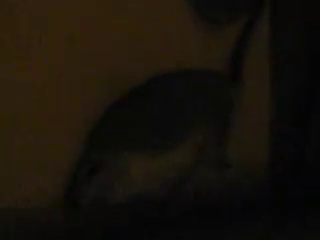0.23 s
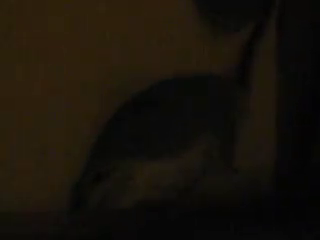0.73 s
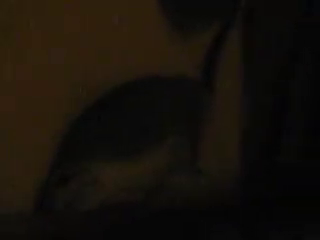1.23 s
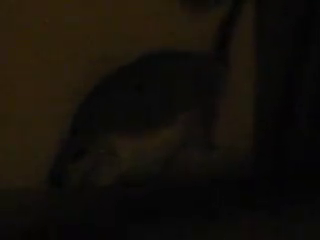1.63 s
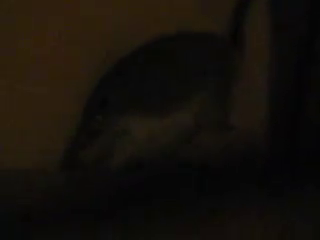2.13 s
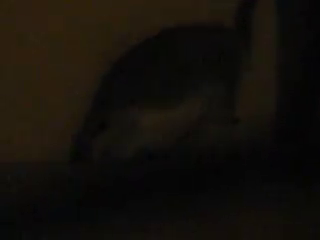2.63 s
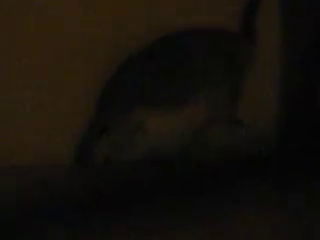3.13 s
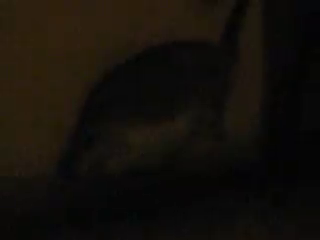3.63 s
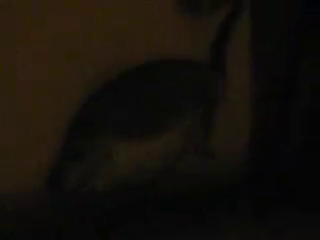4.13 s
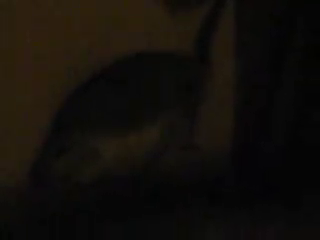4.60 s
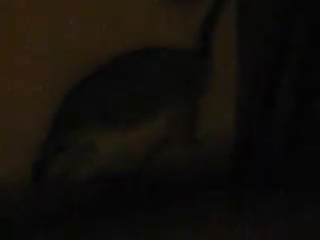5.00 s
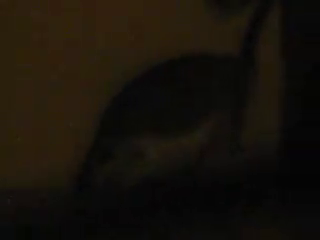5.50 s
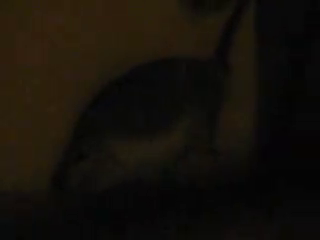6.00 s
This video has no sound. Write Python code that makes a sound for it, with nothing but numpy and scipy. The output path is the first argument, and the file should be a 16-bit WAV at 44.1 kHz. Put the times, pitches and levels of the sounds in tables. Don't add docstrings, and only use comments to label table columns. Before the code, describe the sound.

Very short piercing mouse squeaks repeat about five or six times a second, thin out and stop, leaving soft room air and low hum.

```python
import sys
import numpy as np
from scipy import signal
from scipy.fft import rfft, irfft, next_fast_len
from scipy.io import wavfile
from scipy.ndimage import uniform_filter1d

SR = 44100
rng = np.random.default_rng(int(sys.argv[2]) if len(sys.argv) > 2 else 0)


def gain_from_decibels(decibels):
    exponent = np.asarray(decibels, float) / 20
    return 10 ** exponent


def waveform_to_disk(signal):
    frames = np.transpose(np.atleast_2d(signal))
    scaled = np.clip(frames, -1, 1) * 32767
    samples = np.round(scaled).astype(np.int16)
    wavfile.write(sys.argv[1], SR, samples)


N = 275801
LEAD = 4410
SIDES = np.array([[1], [-1]])

# start in seconds, length in seconds, level in dB,
# top pitch in Hz, where the top is reached as a share of the length.
SQUEAKS = [(-0.075, 0.046, -9.5, 13090, 0.42), (0.093, 0.044, -16.5, 13000, 0.29),
           (0.257, 0.035, -12, 11080, 0.55), (0.418, 0.045, -14, 10100, 0.32),
           (0.601, 0.037, -17, 9720, 0.46), (0.768, 0.033, -12, 10970, 0.45),
           (1.283, 0.042, -12.5, 11170, 0.42), (1.463, 0.041, -14.5, 10520, 0.35),
           (1.637, 0.044, -13, 12000, 0.55), (1.804, 0.039, -11.5, 10180, 0.52),
           (1.995, 0.039, -15, 9700, 0.55), (2.178, 0.042, -13, 10940, 0.5),
           (2.355, 0.047, -15, 10090, 0.28), (2.547, 0.044, -15, 10050, 0.3),
           (2.729, 0.032, -12.5, 11660, 0.47), (2.91, 0.044, -14.5, 10490, 0.65),
           (3.082, 0.043, -14, 11580, 0.6), (3.267, 0.041, -12, 9586, 0.36),
           (3.597, 0.05, -16.5, 13370, 0.6), (3.776, 0.049, -14, 10270, 0.39),
           (3.959, 0.042, -15, 10520, 0.45)]
# start in seconds, length in seconds, level in dB,
# change of level from start to end in dB.
STRAYS = [
    (1.138, 0.025, -16.5, 9),
    (4.159, 0.0098, -35.5, -13),
    (4.177, 0.035, -16.5, 5.5),
    (5.438, .039, -19, 10.5),
    (5.592, 0.0054, -36, -11),
    (5.598, 0.043, -23.5, 7),
]
# first pitch in Hz, top pitch in Hz, top as a share of the length,
# landing pitch in Hz, closing pitch in Hz.
STRAY_ARCHES = [(9000, 9150, .3, 8000, 9400), (7633, 8500, 0.51, 6400, 8000),
                (8980, 9600, 0.71, 9250, 7100), (10700, 11600, .55, 8100, 6850),
                (8000, 8800, 0.63, 9200, 10000), (10600, 13850, 0.34, 11800, 13000)]
# top pitch in Hz, bend of the rise, bend of the fall.
BENDS = [(10300, 1.9, 1.7), (11030, 1.4, 1.05), (12000, 1.396, 1.5), (13230, 1.7, 3.4)]
# left delay in ms, left level in dB,
# right delay in ms, right level in dB.
ECHOES = [(0.587, -1.9, 0.497, -9.4), (0.845, -12.3, 1.151, -13.1), (1.068, -7.7, 1.473, -16.0),
          (1.233, -6.0, 1.954, -17.0), (2.057, -5.9, 2.626, -19.8), (3.609, -14.4, 3.256, -12.5),
          (5.311, -20.9, 3.635, -14.7), (5.928, -14.0, 4.507, -18.1), (6.303, -15.2, 5.335, -19.9)]
# frequency in Hz, left gain in dB, right gain in dB.
PORTS = [(970, -26.5, -27.5), (2511, -6.5, -13), (5000, -16.5, -10.5), (7000, -8.5, -6), (8464, -13, -7),
         (9000, -2, -1.5), (9980, 2.5, 0.77), (10870, -4.5, -2.5), (11990, -9.5, -11), (13670, -6, -10),
         (13800, -17, -23), (16000, -27.5, -31.5)]
# frequency in Hz, density in dB per Hz.
AIR = [(15, -42.5), (27, -16), (60, -7), (87, -13.5), (200, -13.5), (270, -21), (390, -16), (570, -24),
       (1300, -23), (1800, -26.5), (4000, -31.5), (8000, -33), (13000, -39), (16000, -49.5)]
# frequency in Hz, left-right correlation from -1 to 1.
ALIKE = [(60, 0.94), (130, 0.9), (280, 1), (610, 0.61), (1320, 0.6), (2860, 0.32), (6190, -0.019),
         (13400, -0.41)]
# frequency in Hz, level in dB.
HUM = [(59.2, -66.5), (118.4, -60), (301.5, -65.5), (393.0, -77), (759.0, -85.5), (882.9, -76.5),
       (1082, -85.5), (1200, -82.5), (1319, -75), (1545, -77), (2073, -88), (2492, -88.5)]
# time in seconds, level in dB.
HUM_SWELL = [
    (0.0, -63),
    (.5, -62.5),
    (1.3, -67.5),
    (2.4, -63.5),
    (3.5, -64.5),
    (3.93, -80.5),
    (4.55, -59.5),
    (5.3, -56.5),
    (5.85, -75),
    (6.25, -66),
]
# first pip in seconds, last pip in seconds.
FOCUS = [
    (0.027, 1.7),
    (5.528, 7),
]
# multiple of the pitch, level at the right port in dB.
PIP = [(1, -68.5), (2, -77), (3, -70)]
# time in seconds, peak level in dB, centre in Hz,
# bandwidth in Hz, 60 dB decay time in seconds.
TICKS = [(.954, -41, 9000, 9000, 0.014), (1.09, -48.5, 8940, 8800, .012), (5.066, -44.5, 810, 404, 0.066),
         (1.315, -47, 695.6, 500, 0.064), (5.404, -47, 7100, 2990, .03), (5.424, -47.5, 1110, 600, 0.18),
         (5.43, -46, 8000, 7000, .015), (5.648, -46, 5000, 6200, 0.024), (5.885, -43.5, 89.6, 60, 0.083),
         (5.93, -47.5, 84.6, 60, 0.17), (6.227, -46, 1100, 703, 0.074), (6.227, -45.5, 3220, 700, 0.069)]


def on_hz(table, column, count):
    hz = np.maximum(np.fft.rfftfreq(count, 1 / SR), 1)
    return np.interp(np.log(hz), np.log(np.array(table)[:, 0]), np.array(table)[:, column])


def two_ports(mid, side, alike):
    return np.sqrt(1 + alike) * mid + np.sqrt(1 - alike) * side * SIDES


def walk(rate_hz):
    hold = int(SR / rate_hz)
    drift = np.repeat(rng.standard_normal(N // hold + 1), hold)
    drift = uniform_filter1d(uniform_filter1d(drift, hold), hold)[:N]
    return drift / drift.std()


def calls():
    from_hz, to_hz, shut_hz = 8170, 9130, 6565
    run = []
    for start, length, db, top_hz, at in SQUEAKS:
        above_hz = top_hz - 10500
        change_db = -4 + 2.5 * start + 5 * (at - .5) + 1.5 * above_hz / 1000
        land_hz = min(to_hz - 0.11 * above_hz, top_hz - 990)
        run.append((start, length, db, change_db, from_hz, top_hz, at, land_hz, shut_hz))
    strays = [tuple(a) + tuple(b) for a, b in zip(STRAYS, STRAY_ARCHES)]
    return sorted(run + strays)


def arch(share, from_hz, top_hz, at, to_hz):
    at = np.clip(at, .1, .9)
    hz, *bends = np.transpose(BENDS)
    up, down = (max(np.interp(top_hz, hz, bend), .6) for bend in bends)
    rise = (top_hz - from_hz) * np.clip(1 - share / at, 0, 1) ** up
    fall = (top_hz - to_hz) * np.clip((share - at) / (1 - at), 0, 1) ** down
    return top_hz - rise - fall


def mouse(open_s=0.0025, shut_s=0.000612, drop_s=0.0014, shut_db=14.5, wobble_hz=39.7,
          snap_db=-18.5, sigh_db=-33.0, octave_db=-13.5, pan_db=-1.1):
    out, after = np.zeros((2, N + LEAD)), np.arange(700) / SR
    squeaks = calls()
    wobble, puff = rng.standard_normal((2, len(squeaks), 4410))
    for k, (start, length, db, change_db, *pitch, shut_hz) in enumerate(squeaks):
        t = np.arange(int(length * SR)) / SR
        hz = uniform_filter1d(arch(t / length, *pitch), len(t) // 16, mode="nearest")
        shutting = np.exp((t - length) / drop_s)
        hz = hz + (shut_hz - hz[-1]) * shutting
        hz = hz - 1100 * np.exp(-t / .0009)
        hz = hz + wobble_hz * 6 * uniform_filter1d(wobble[k, :len(t)], size=36)
        turn = 2 * np.pi * np.cumsum(hz) / SR

        push = np.clip(t / open_s, 0, 1) * np.clip((length - t) / shut_s, 0, 1)
        push = push * gain_from_decibels(change_db * (t / length - .5) - shut_db * shutting)
        octave = gain_from_decibels(octave_db + 6.0 * wobble[k, -1]) * np.exp(-t / .0018) * np.cos(2 * turn)
        snap = gain_from_decibels(snap_db) * uniform_filter1d(puff[k, :len(t)], size=3) * np.exp(-t / 0.0026)
        whistle = np.sqrt(2) * push * (np.sin(turn) + octave) + snap

        rough = 1 + .9 * uniform_filter1d(puff[k, -len(after):], size=9)
        slide_hz = (1900 + (shut_hz - 1900) * np.exp(-after / 0.0041)) * rough
        fade = np.exp(-after / 0.032) * (1 + 3 * np.exp(-after / .0015))
        sigh = gain_from_decibels(sigh_db + 5.0 * wobble[k, -2]) * fade * np.sin(2 * np.pi * np.cumsum(slide_hz) / SR)

        call = np.concatenate([whistle, sigh])
        i = int(start * SR) + LEAD
        out[:, i:i + len(call)] += call * gain_from_decibels(db + pan_db * SIDES / 2)
    return out


def room(x, rise_s=0.00099):
    t = np.arange(SR // 2) / SR
    diffuse = np.sqrt(2) * rng.standard_normal(len(t))
    fade = 0
    for db, t60_s in [(-10, 0.089), (-35, .3)]:
        fade = fade + gain_from_decibels(db - 60 * t / t60_s) / np.sqrt(t60_s * SR / np.log(1000))
    tail = diffuse * fade * (1 - np.exp(-(t / rise_s) ** 2))

    count = next_fast_len(x.shape[1] + len(t))
    turn_per_ms = -2j * np.pi * np.fft.rfftfreq(count, 1 / SR) / 1000
    delay_ms = np.array(ECHOES)[:, 0::2, None]
    gain = gain_from_decibels(np.array(ECHOES)[:, 1::2, None])
    early = 1 + sum(g * np.exp(turn_per_ms * d) for d, g in zip(delay_ms, gain))
    path = early / np.sqrt(1 + (gain ** 2).sum(0)) + rfft(tail, count)

    cep = irfft(np.log(gain_from_decibels([on_hz(PORTS, side, count=1024) for side in (1, 2)])))
    folded = np.concatenate([cep[:, :1], 2 * cep[:, 1:512], 0 * cep[:, 512:]], axis=1)
    colour = irfft(np.exp(rfft(folded)))
    return irfft(rfft(x, count) * path * rfft(colour, count), count)[:, LEAD:LEAD + N]


def air(level_db=-62.5, drift_db=.3, pan_db=-.6):
    count = next_fast_len(N)
    alike = np.clip(on_hz(ALIKE, 1, count=count), -.9, .99)
    mid, side = rfft(rng.standard_normal((2, count))) * gain_from_decibels(on_hz(AIR, 1, count=count))
    both = irfft(two_ports(mid, side, alike), count)[:, :N]
    sos = signal.butter(2, [500, 8000], "bandpass", fs=SR, output="sos")
    middle = signal.sosfilt(sos, both.mean(0))
    return both * gain_from_decibels(level_db + drift_db * walk(1.7) + pan_db * SIDES / 2) / middle.std()


def hum(waver_db=1.8, waver_hz=0.676):
    swell_s, swell_db = np.transpose(HUM_SWELL)
    out = 0
    for hz, db in HUM:
        if 110 < hz < 130:
            db = np.interp(np.arange(N) / SR, swell_s, swell_db)
        phase = 2 * np.pi * (rng.random() + np.cumsum(hz + waver_hz * walk(2)) / SR)
        out = out + np.sqrt(2) * gain_from_decibels(db + waver_db * walk(4)) * np.sin(phase)
    return out


def focus(hz=1923., period_s=.1, on_s=0.04, left_db=-18.0):
    t, gate = np.arange(N) / SR, np.zeros(N)
    for first, last in FOCUS:
        gate += (t >= first) & (t < last + on_s) & ((t - first) % period_s < on_s)
    whine = sum(gain_from_decibels(db) * np.sin(2 * np.pi * round(k) * hz * t) for k, db in PIP)
    pip = np.sqrt(2) * uniform_filter1d(gate, size=200) * whine * gain_from_decibels(.6 * walk(6))
    return np.array([pip * gain_from_decibels(left_db), pip])


def band(x, hz, width_hz):
    return signal.lfilter(*signal.iirpeak(hz, hz / width_hz, fs=SR), x)


def ticks():
    out, t = np.zeros((2, N + SR)), np.arange(SR // 4) / SR
    grit = rng.standard_normal((len(TICKS), 2, len(t)))
    for (start, db, hz, width_hz, t60_s), (mid, side) in zip(TICKS, grit):
        burst = (mid + min(hz / 6000, .6) * side * SIDES) * gain_from_decibels(-60 * t / t60_s)
        burst = band(band(burst, hz, width_hz), hz, width_hz * 2)
        i = int(start * SR)
        out[:, i:i + len(t)] += burst * gain_from_decibels(db) / np.abs(burst).max()
    return out[:, :N]


def scene():
    return room(mouse()) * gain_from_decibels(.8 * SIDES) + air() + hum() + focus() + ticks()


def roll_off(x):
    return signal.sosfilt(signal.butter(12, 16100, fs=SR, output="sos"), x)


def record(dry, ceiling=.55, spill=.2):
    over = dry - np.clip(dry, -ceiling, ceiling)
    over = signal.sosfiltfilt(signal.butter(6, 11800, fs=SR, output="sos"), over)
    return roll_off(dry - spill * over)


dry = scene()
out = record(dry)
waveform_to_disk(out)
```